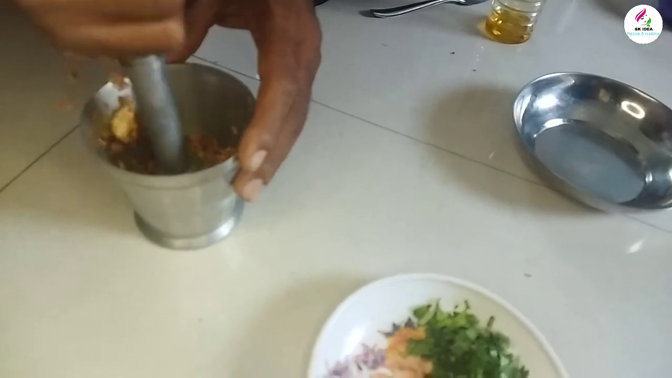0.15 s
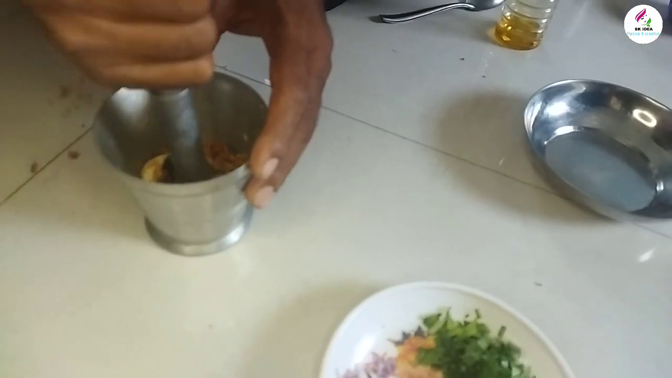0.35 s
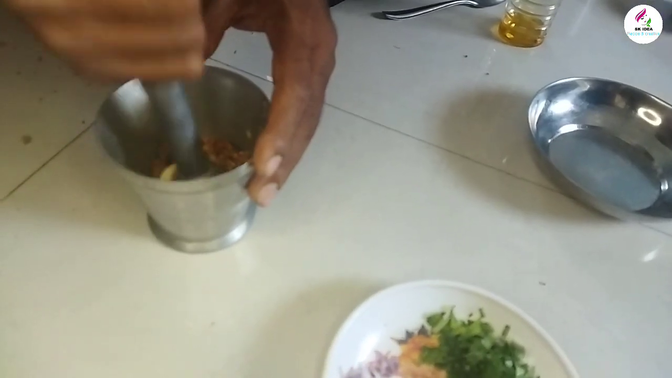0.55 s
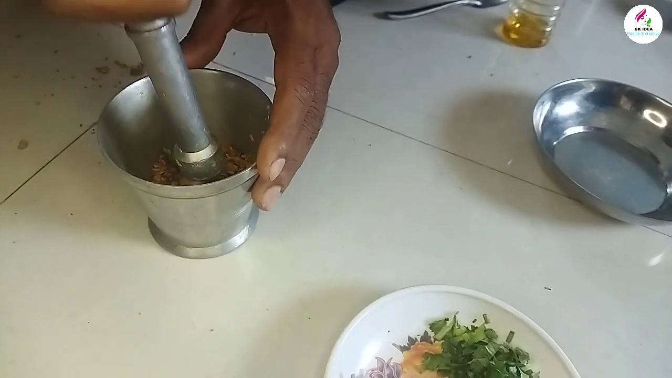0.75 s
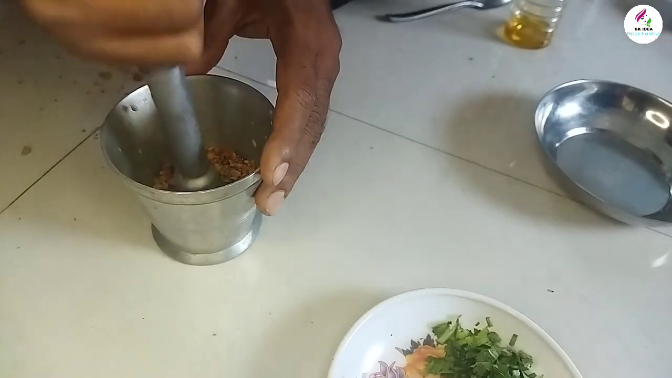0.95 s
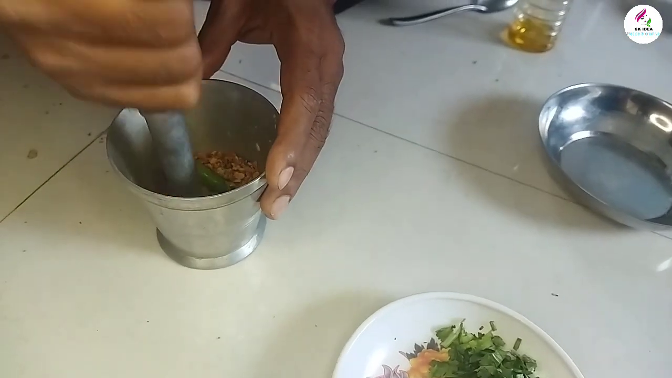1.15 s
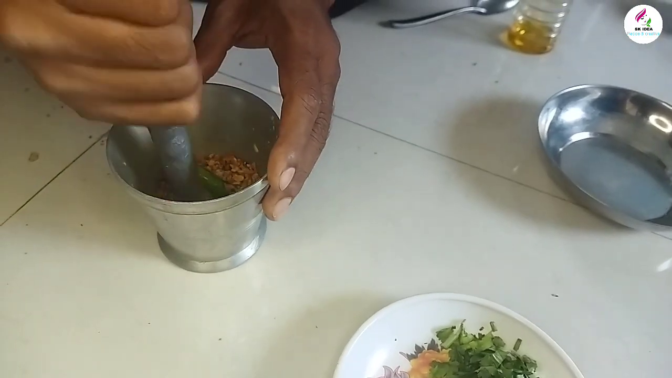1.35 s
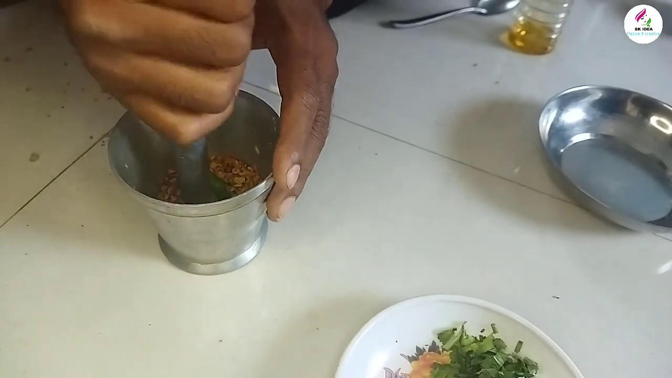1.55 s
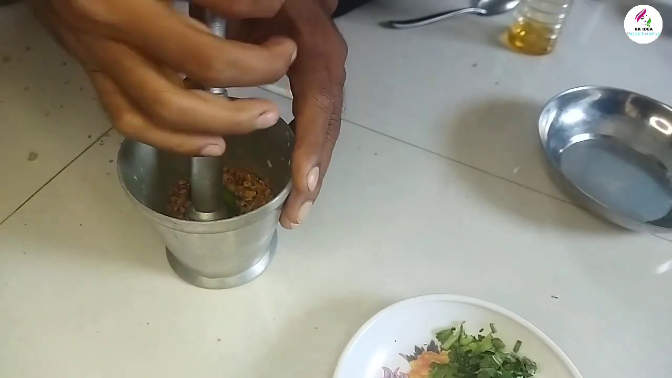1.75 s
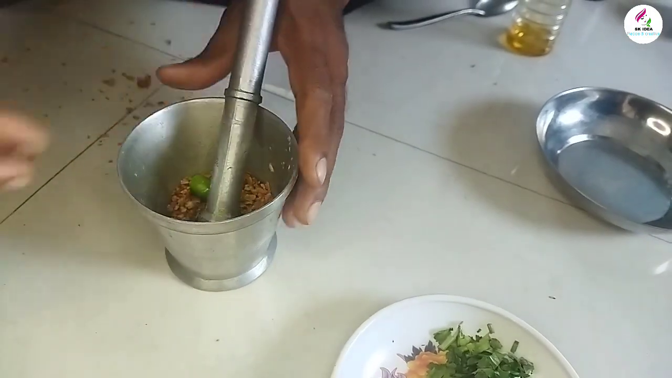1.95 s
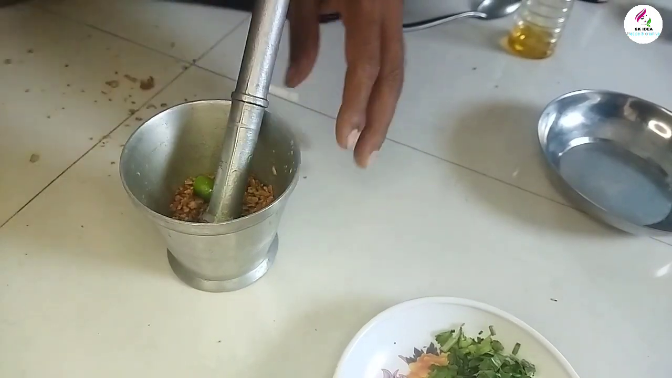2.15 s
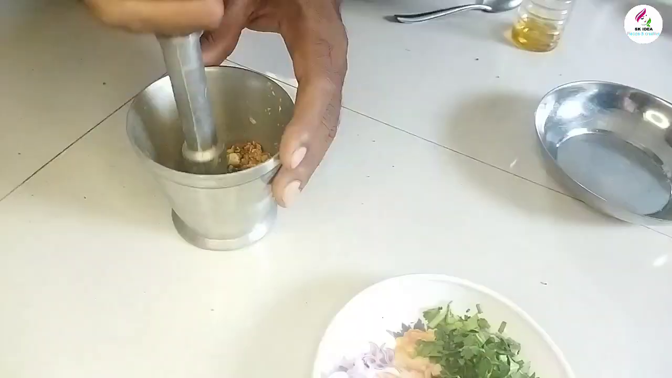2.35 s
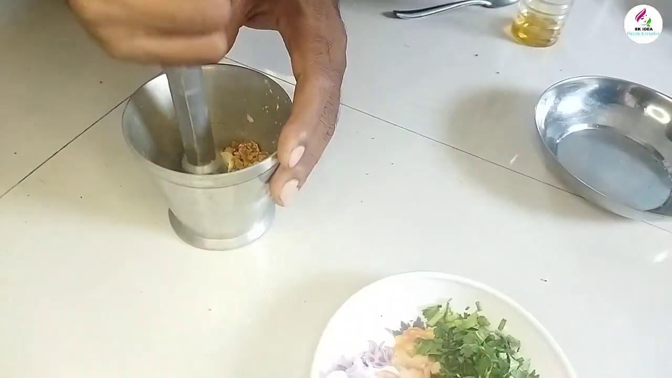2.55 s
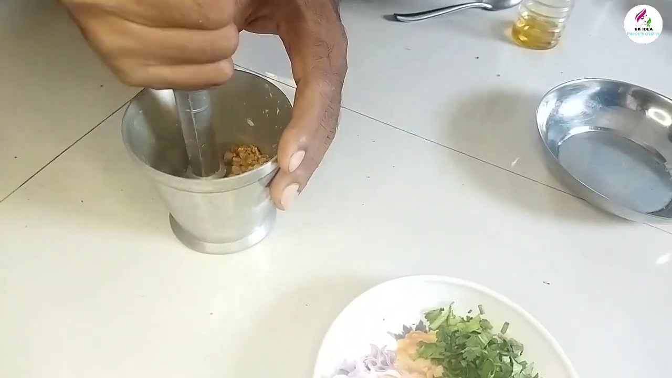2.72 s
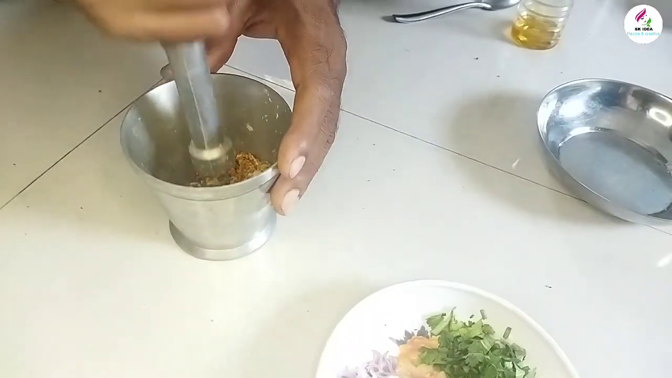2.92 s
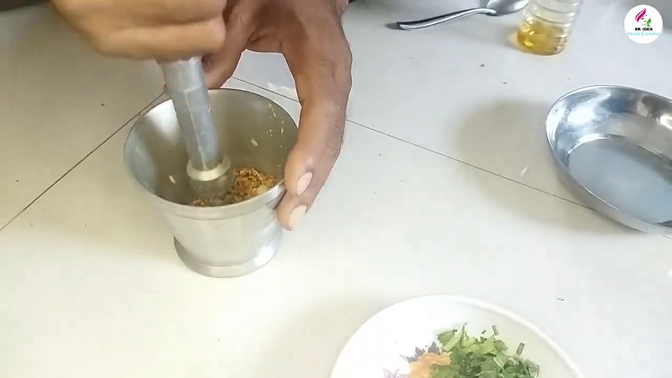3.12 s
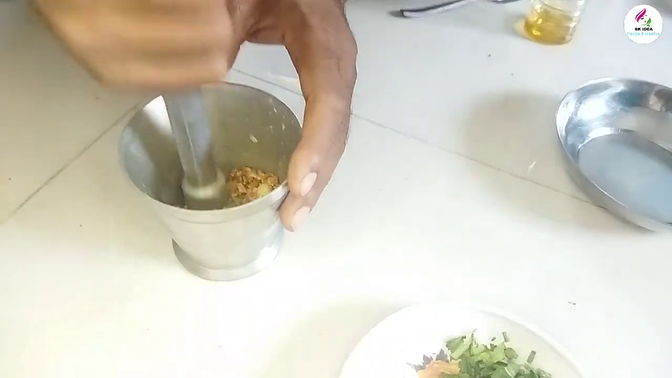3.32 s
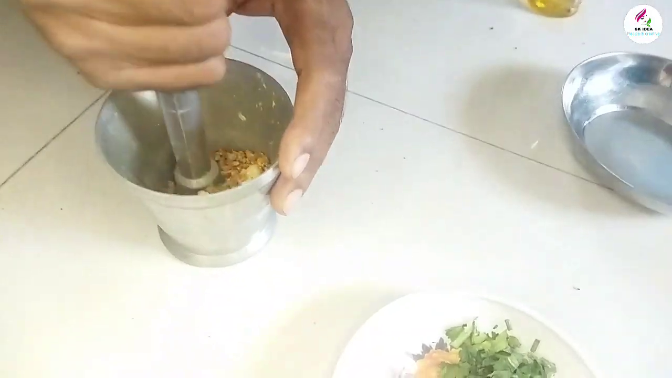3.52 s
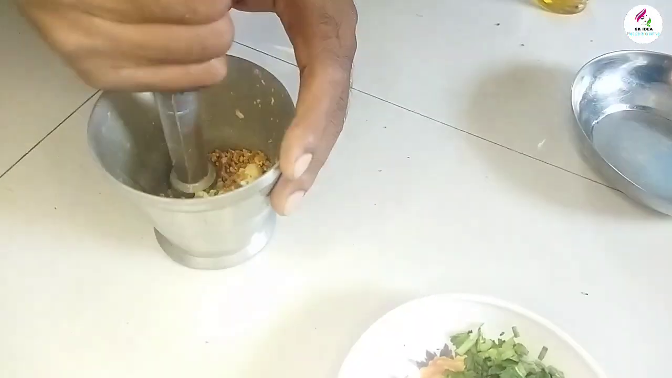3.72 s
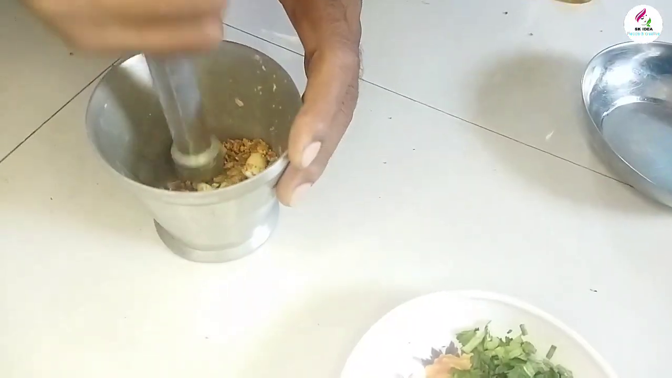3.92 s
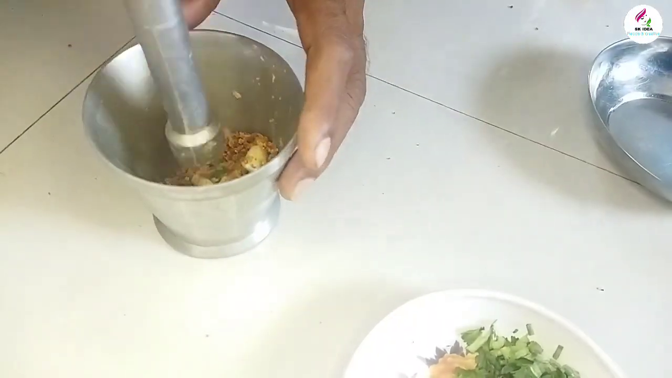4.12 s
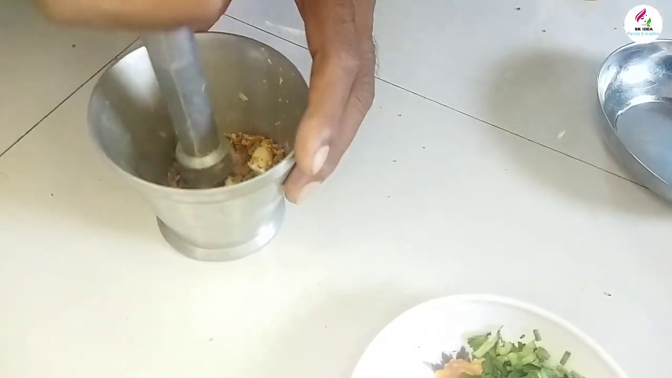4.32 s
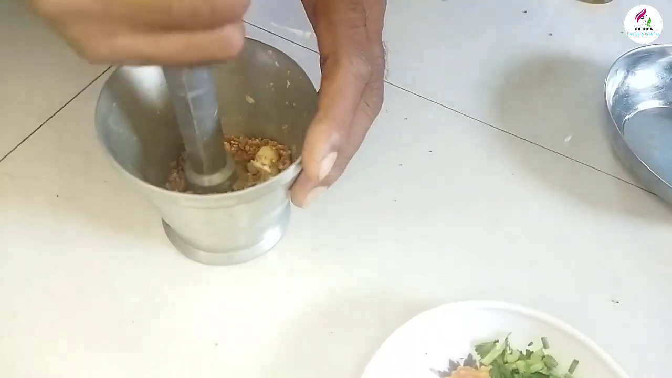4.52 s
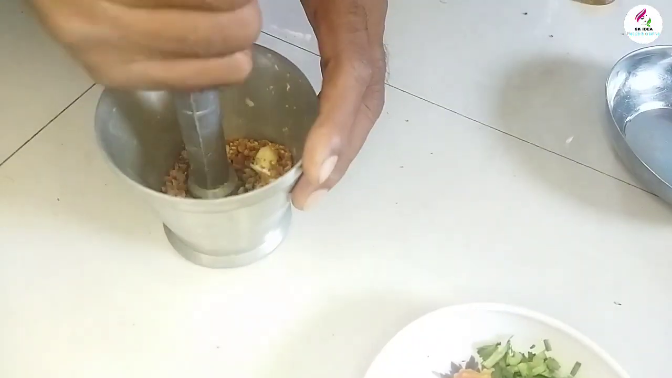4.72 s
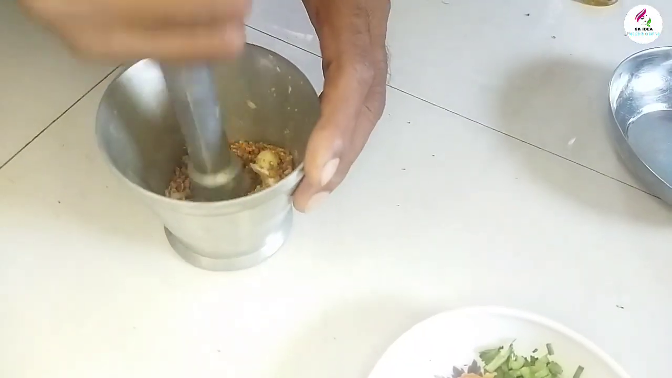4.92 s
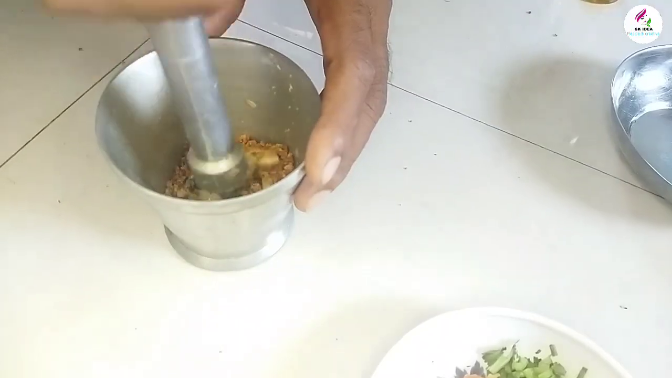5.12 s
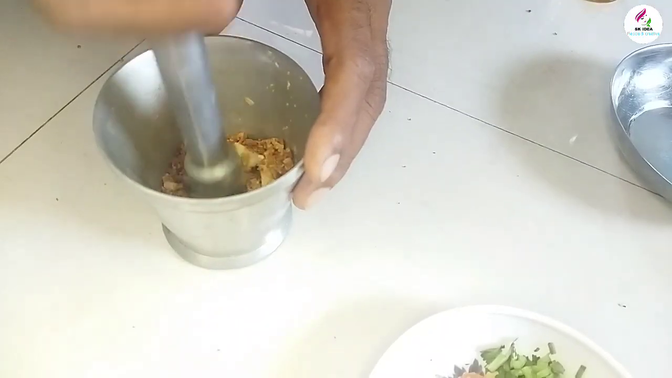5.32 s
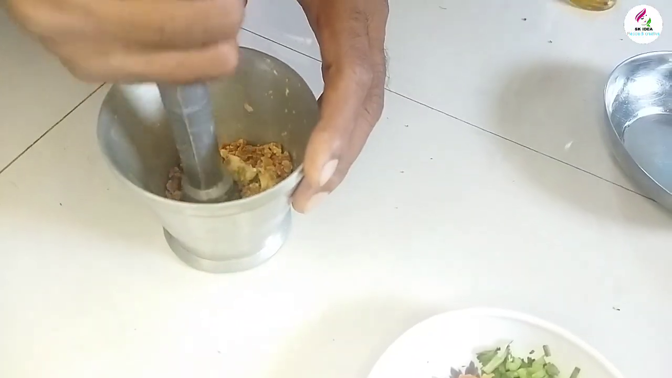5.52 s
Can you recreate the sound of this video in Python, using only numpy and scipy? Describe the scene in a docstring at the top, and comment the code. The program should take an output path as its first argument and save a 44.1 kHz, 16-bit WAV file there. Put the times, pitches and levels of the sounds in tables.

```python
"""Over a quiet motor hum, a steel pestle pounds spices in a steel mortar on tile, about four blows a second.
Most blows crunch into the food as swelling clumps of grainy noise; four reach bare metal, crack and ring in wall modes.
The mortar rocks with hollow, swelling tones, and dry seeds snap as short noise bursts.
In a short pause the hand hisses along the pestle, leans it on the rim and lets it rattle.
The motor, a set of wavering shaft multiples, stops in that pause; the hard kitchen answers with a noise-tail echo."""
import sys
import numpy as np
from scipy import signal
from scipy.fft import rfft, irfft, next_fast_len
from scipy.io import wavfile
from scipy.ndimage import map_coordinates

SR = 44100
rng = np.random.default_rng(int(sys.argv[2]) if len(sys.argv) > 2 else 0)


def output_pcm(signal):
    """Save a mono or channel-first signal as 16-bit PCM at the path in sys.argv[1].

    Samples are clipped to [-1, 1] before scaling.
    """
    pcm = np.clip(np.atleast_2d(signal).T, -1, 1) * 32767
    wavfile.write(sys.argv[1], SR, np.round(pcm).astype(np.int16))


N = 245637
TIME = np.arange(N) / SR


def amp(db):
    """Decibels to gain."""
    return 10 ** (np.asarray(db) / 20)


def unit(x):
    """Scale to rms 1."""
    return x / np.sqrt(np.mean(x ** 2) + 1e-20)


def along(points, hz):
    """Read a curve of (frequency, value) points on a log frequency axis."""
    point_hz, value = np.transpose(points)
    return np.interp(np.log(hz + 1), np.log(point_hz + 1), value)


def curves(rows):
    """One value per sample for each column after the time."""
    time_s, *columns = np.transpose(rows)
    return [np.interp(TIME, time_s, column) for column in columns]


def wobble(rate, size=N):
    """A smooth random curve with the given number of knots a second."""
    knots = rng.standard_normal(int(size * rate / SR) + 4)
    return map_coordinates(knots, [np.arange(size) * rate / SR])


def swell(start, peak, rise_db_per_s, fall_db_per_s):
    """Gain that sets in at start, climbs to 1 at peak and dies away."""
    db = np.minimum(rise_db_per_s * (TIME - peak), fall_db_per_s * (peak - TIME))
    onset = np.clip((TIME - start) / .005, 0, 1)
    return onset * amp(db)


def add(track, s, x):
    """Mix x into the track from time s on."""
    i = max(round(s * SR), 0)
    track[..., i:i + x.shape[-1]] += x[..., :N - i]


def pan(db):
    """Left and right gains for a level difference."""
    return amp([[db / 2], [-db / 2]])


# how alike noise is in the two channels: frequency_hz, correlation (-1 to 1)
STEREO_LIKENESS = [(100, 0.53), (600, 0.65), (1500, 0.25), (4000, 0.6), (8000, -0.33), (14000, 0.036)]


def noise(spectrum, size, tilt_db=0, spiky=0, uneven_db=0):
    """Coloured stereo noise of rms 1; spiky roughens it into clicks, uneven adds random spectral peaks and dips."""
    hz = np.fft.rfftfreq(size, 1 / SR)
    spikes = np.exp(spiky * rng.standard_normal(size).clip(-2, 2))
    white = rng.standard_normal((2, size)) * spikes
    ripple = map_coordinates(rng.standard_normal(size=100), [hz / 260])
    octaves = np.log2(np.maximum(hz, 1000) / 1000)
    # the tilt counts per two octaves above 1 kHz
    gain = amp(along(spectrum, hz) + tilt_db * octaves / 2 + uneven_db * ripple)
    # the mid-side mix sets the likeness of left and right
    turn = np.arccos(np.clip(along(STEREO_LIKENESS, hz), -1, 1)) / 2
    mid, side = irfft(rfft(white) * gain * [np.cos(turn), np.sin(turn)], size)
    return unit(np.array([mid + side, mid - side]))


# how long the kitchen rings: frequency_hz, t60_s
KITCHEN_DECAY = [(150, 0.43), (1000, 0.42), (2800, 0.38), (6000, 0.35), (10000, 0.34), (15000, 0.24)]


def echo(x, build=0.0019, gap=0.0041, wall_db=-15, wall_s=.0375):
    """The kitchen's answer: a tail that builds up, favours some frequencies, and holds one far wall."""
    hz, t, grains = signal.stft(rng.standard_normal((2, SR * 2 // 5)), SR, nperseg=256)
    uneven_db = rng.normal(0, 1.7, (len(hz), 1)) * (hz[:, None] > 1500)
    decay_db = -60 * t / along(KITCHEN_DECAY, hz)[:, None]
    tail = signal.istft(grains * amp(uneven_db + decay_db), SR, nperseg=256)[1]
    since_gap = np.maximum(np.arange(tail.shape[1]) / SR - gap, 0)
    tail = tail * (1 - np.exp(-since_gap / build))
    tail = tail / np.linalg.norm(tail[0])
    tail[:, round(wall_s * SR)] += amp(wall_db)
    return signal.fftconvolve(x, tail, axes=1)


def room(x, wet_db):
    """A sound with its echo."""
    wet = amp(wet_db) * echo(x)
    return wet + np.pad(x, [(0, 0), (0, wet.shape[1] - x.shape[1])])


# colour of the room's air: frequency_hz, relative_density_db (per Hz)
AIR_SPECTRUM = [(15, -57), (25, -19), (173, 3), (537, -7.5), (970, -6), (1110, -2.5), (1530, -5.5),
                (1800, -7.5), (3260, -11.5), (6550, -22), (7500, -27), (9810, -18.5), (10600, -30),
                (15500, -22.5)]
# level of the room's air, before a slight waver: time_s, level_db
AIR_LEVEL = [(0, -57.5), (2.1, -57.5), (2.45, -62.5), (5.57, -64.5)]


def room_air():
    """Still air as gently wavering coloured noise, with a faint unsteady tone at 181 Hz."""
    drone = amp(-72.0 + 1 * wobble(3.7)) * np.sin(2 * np.pi * 181 * TIME + 0.64 * wobble(3.7))
    air_db, = curves(AIR_LEVEL)
    return drone + amp(air_db + wobble(7.1)) * noise(AIR_SPECTRUM, N)


# the motor's orders: shaft_multiple, relative_level_db
MOTOR_PARTIALS = [(2, -19), (3, -20), (4, -43), (5, -9.5), (6, -3.5), (7, -15.5), (8, -19), (9, -30)]
# the motor slows a little as its load grows
SHAFT_HZ, SHAFT_SAG_HZ_PER_S, SHAFT_WAVER_HZ = 38.15, .25, 0.12
# it grows louder until it is switched off
MOTOR_OFF_S, MOTOR_DB, MOTOR_RISE_DB_PER_S, MOTOR_FALL_DB_PER_S = 2.115, -49, 2, 128


def motor():
    """Multiples of one sagging shaft speed, each wavering in level on its own."""
    shaft_hz = SHAFT_HZ - SHAFT_SAG_HZ_PER_S * TIME + SHAFT_WAVER_HZ * wobble(4.85)
    angle = 2 * np.pi * np.cumsum(shaft_hz) / SR
    hum = np.zeros(N)
    for multiple, db in MOTOR_PARTIALS:
        phase = rng.uniform(0, 2 * np.pi)
        hum += amp(db + 2.5 * wobble(4)) * np.sin(round(multiple) * angle + phase)
    return amp(MOTOR_DB) * swell(0, MOTOR_OFF_S, MOTOR_RISE_DB_PER_S, MOTOR_FALL_DB_PER_S) * hum


# colour of skin on steel: frequency_hz, relative_density_db (per Hz)
SKIN_SPECTRUM = [(240, -43), (400, -10), (796, -7), (1020, -9), (1170, 2), (1540, -14), (1660, -1),
                 (3110, -2.5), (6380, -12), (6990, -14), (9950, 3), (15500, -8)]
# the hand slides along the pestle: first_touch_s, greatest_speed_s, gain_db
HAND_SLIDES = [(1.679, 1.893, -39), (2.115, 2.27, -56.5)]
SLIDE_RISE_DB_PER_S, SLIDE_FALL_DB_PER_S = 62, 131
# the pestle grazes the wall: first_touch_s, greatest_pressure_s, gain_db
WALL_GRAZES = [(0.147, 0.245, -58.5), (0.383, 0.454, -51)]
GRAZE_RISE_DB_PER_S, GRAZE_FALL_DB_PER_S = 150, 330


def sliding():
    """Skin hisses over steel in quick little jerks; steel grazing steel makes high wall modes sing faintly."""
    speed, pressure, song = np.zeros((3, N))
    for start, peak, db in HAND_SLIDES:
        speed += amp(db) * swell(start, peak, SLIDE_RISE_DB_PER_S, SLIDE_FALL_DB_PER_S)
    jerks_db = 2.2 * wobble(45) + 2.2 * wobble(300)
    hiss = noise(SKIN_SPECTRUM, N, tilt_db=2, spiky=.8, uneven_db=2)
    for start, peak, db in WALL_GRAZES:
        pressure += amp(db) * swell(start, peak, GRAZE_RISE_DB_PER_S, GRAZE_FALL_DB_PER_S)
    for hz, db in [(10030, -7), (10890, -2)]:
        song += amp(db + 5 * wobble(30)) * np.sin(2 * np.pi * hz * TIME + 1.5 * wobble(90))
    return room(speed * amp(jerks_db) * hiss + pressure * song, wet_db=-4)[:, :N]


# colour of a breaking seed: frequency_hz, relative_density_db (per Hz)
SEED_SPECTRUM = [(300, -59), (1500, -26), (2700, -0.5), (5000, -10), (7500, -3.5), (10000, 3), (13000, 2),
                 (15000, -22.5)]
# single seeds snap: time_s, gain_db, treble_tilt_db (per two octaves above 1 kHz)
SEED_SNAPS = [(.314, -36, -24), (.8618, -18.5, -10), (2.61, -18, 6), (2.9955, -34, -22), (4.5013, -25, -2),
              (5.2206, -19, -3)]


def snapping(size=1024, count=36):
    """Dry seeds burst within a few milliseconds; loose crumbs tick into the cup at random times."""
    out, crumbs = np.zeros((2, 2, N))
    t = np.arange(size) / SR
    for s, db, tilt_db in SEED_SNAPS:
        burst = np.exp(-t / 0.0021) * noise(SEED_SPECTRUM, size, tilt_db, spiky=.3)
        add(out, s, room(amp(db) * burst, wet_db=-11.5))
    for when, strength in rng.random((count, 2)):
        tick = np.exp(-t / .0012) * noise(SEED_SPECTRUM, size, tilt_db=-12, uneven_db=5)
        add(crumbs, when * N / SR, amp(-59 + 11 * strength) * tick)
    return out + room(crumbs, wet_db=-11.5)[:, :N]


# colour of food breaking up: frequency_hz, relative_density_db (per Hz)
CRUNCH_SPECTRUM = [(100, -26.5), (520, -22), (760, -4.5), (1100, -7), (1450, -1.5), (1850, 0.5),
                   (3200, 1.5), (4700, -2.5), (6000, -7.5), (7700, -11.5), (9600, -3.5), (11000, -9),
                   (15000, -7.5)]
# colour of the thud at the bottom: frequency_hz, relative_density_db (per Hz)
THUD_SPECTRUM = [(25, -55.5), (70, -9), (190, -6), (340, 6.5), (520, -11.5), (760, 1.5), (1200, -5.5),
                 (3000, -52)]


def hollow(hz, swell=0.0038, size=2048):
    """A light contact, then the air in the cup swells and dies within a few cycles."""
    t = np.arange(size) / SR
    shape = (t / swell) ** 2 * np.exp(2 * (1 - t / swell))
    tone = np.sin(2 * np.pi * hz * t + np.array([[0], [.7]]))
    light_crunch = amp(-12) * noise(CRUNCH_SPECTRUM, size, tilt_db=-12)
    contact = light_crunch + amp(-15) * noise(THUD_SPECTRUM, size)
    return shape * tone + np.exp(-t / 0.0031) * contact


# the hollow note, and its relative spread from contact to contact
CUP_HZ, CUP_SCATTER = 1116.3, .03


def cup_note(db):
    """The cup's hollow note in the room, a little different in pitch each time."""
    hz = CUP_HZ * np.exp(rng.normal(0, CUP_SCATTER))
    return room(amp(db) * hollow(hz), wet_db=-8)


# the mortar tips and knocks on the tile as the pestle lifts or comes down: time_s, gain_db
MORTAR_KNOCKS = [(0.178, -41.5), (0.2754, -33.5), (0.39, -40), (0.4391, -40.5), (0.6756, -33),
                 (0.7906, -33), (0.9472, -34.5), (1.1883, -37.5), (1.296, -39), (2.0249, -40),
                 (2.4453, -42.5), (2.6948, -47), (2.9433, -40), (3.068, -39.5), (3.1815, -46),
                 (4.0918, -35), (4.313, -46), (4.5521, -45.5), (4.8085, -43.5), (5.535, -41)]
# let go, it rattles: start, first knock's gain, spacing, loss per knock
RATTLE_S, RATTLE_DB, RATTLE_GAP_S, RATTLE_LOSS_DB = 1.859, -21, .0155, 3.3


def rocking(count=5):
    """Each tip of the mortar onto the tile sounds its hollow note: single knocks and one dying rattle."""
    out = np.zeros((2, N))
    rattle = [(RATTLE_S + k * RATTLE_GAP_S, RATTLE_DB - k * RATTLE_LOSS_DB) for k in range(count)]
    for s, db in [*MORTAR_KNOCKS, *rattle]:
        add(out, s - .001, cup_note(db))
    return out


# the mortar's wall ringing freely: frequency_hz, relative_level_db, t60_s
WALL_MODES = [(1135, -21, .3), (1452, -24, .28), (1795, -7, .35), (2574, -18, .3), (2695, -13, .33),
              (2767, -13, .31), (2890, -15, .28), (3358, -19, .2), (4137, 4.5, .24), (4615, -17, .22),
              (7275, -28, .33), (10030, -13, .25), (10890, -21, .28), (12010, -27, .18), (12673, -15, .24),
              (14950, -20, .22)]


def ring(soft_db=0, size=SR * 2 // 5):
    """The wall's decaying modes, new in strength and phase each time; softness costs dB per octave above 1.8 kHz."""
    t = np.arange(size) / SR
    out = np.zeros((2, size))
    for hz, db, t60 in WALL_MODES:
        # nearly the same phase in both channels
        phase = rng.uniform(0, 2 * np.pi) + rng.normal(0, .4, (2, 1))
        strength_db = db + rng.normal(0, 1.2) - soft_db * np.log2(max(hz / 1800, 1))
        out += amp(strength_db - 60 * t / t60) * np.sin(2 * np.pi * hz * t + phase)
    return out * (1 - np.exp(-t / 0.00075))


# the wall's broad resonances while the pestle presses on it:
# frequency_hz, width_hz, relative_level_db, extra_gain_into_room_db
PRESSED_MODES = [(1190, 490, -25.5, 4), (1828, 210, -9.5, 5.5), (2753, 140, -6, 8), (3363, 307, 6.5, -9),
                 (4090, 92, -5.5, -10), (4370, 220, -7.5, -3.5), (6100, 170, -26.5, -25),
                 (6830, 570, -27.5, 12), (9020, 940, -12, 1.5), (10060, 67, -27.5, 11),
                 (11400, 180, -15.5, -25), (12650, 130, -18, -6.5), (14930, 260, -13.5, -14)]


def crack(chatter=0.0029, chatter_db=-19, size=2048):
    """A hard contact and brief chatter through the damped wall: the near sound and the part thrown into the room."""
    t = np.arange(size) / SR
    force = amp(chatter_db) * np.exp(-t / chatter) * rng.standard_normal((2, size))
    force[:, 0] += 1  # the first contact
    near, thrown = np.zeros((2, 2, size))
    for hz, width, db, room_db in PRESSED_MODES:
        phase = rng.normal(0, 1.0, (2, 1))
        mode = amp(db) * np.exp(-np.pi * width * t) * np.sin(2 * np.pi * hz * t + phase)
        near += mode
        thrown += amp(room_db) * mode
    cracks = [signal.fftconvolve(force, body, axes=1) for body in (near, thrown)]
    # the cracks carry little bass
    bass_cut = signal.butter(2, 800, "highpass", fs=SR, output="sos")
    return signal.sosfilt(bass_cut, cracks)


# the pestle is leant on the rim: time_s, crack_gain_db (before a 3 dB cut), ring_gain_db
RIM_TAPS = [(1.86, -47, -40), (1.906, -40, -43), (2.283, -34.5, -43), (2.2888, -30, -41)]


def leaning():
    """Gentle steel taps: the thrown part of a crack in the room, and a soft ring."""
    out = np.zeros((2, N))
    for s, crack_db, ring_db in RIM_TAPS:
        _, thrown = crack()
        add(out, s, room(amp(crack_db - 3) * thrown, wet_db=-1))
        add(out, s, amp(ring_db) * ring(soft_db=14))
    return out


# steel meets steel: time_s, crack_gain_db, ring_gain_db, thump_gain_db
STEEL_CLANGS = [(3.2435, -10, -30, -41), (3.4923, -11.5, -28.5, -33.5), (3.7314, -9.5, -25.5, -32),
                (3.9755, -11, -19, -55)]
FOOT_HZ = 397  # the mortar bouncing on the tile


def clanging():
    """Bare steel cracks, the wall rings on and the floor thumps."""
    out = np.zeros((2, N))
    t = np.arange(SR // 10) / SR
    bounce = np.exp(-t / 0.007) * np.sin(2 * np.pi * FOOT_HZ * t)
    push = (1 - t / .003) * np.exp(-t / 0.0013) + amp(-3) * bounce
    for s, crack_db, ring_db, thump_db in STEEL_CLANGS:
        near, thrown = crack()
        add(out, s, amp(crack_db) * near)
        add(out, s, amp(crack_db - 4.5) * echo(thrown, build=0.041, wall_db=-6))
        add(out, s, room(amp(ring_db) * ring(), wet_db=-9))
        add(out, s, amp(thump_db) * room(np.array([push, push]), wet_db=-11.5))
    return out


def crush(db, rise, fall, tilt_db, thud_db, size=4096):
    """The crunch grows in clumps from first touch as food packs, then dies with a thud at the bottom, midway through."""
    t = (np.arange(size) - size // 2) / SR
    touch = np.clip((t + rise) / .005, 0, 1)
    squeeze_db = -17 * np.abs(t / rise) ** 1.07
    release_db = -14 * np.abs(t / fall) ** 1.17
    press = touch * amp(np.where(t < 0, squeeze_db, release_db))
    clumps = amp(1.8 * wobble(700, size))
    grains = noise(CRUNCH_SPECTRUM, size, tilt_db, spiky=.55, uneven_db=2.2)
    crunch = amp(db) * press * clumps * grains * pan(db=-1)
    thud = amp(thud_db) * np.exp(-np.abs(t - .002) / 0.0045) * noise(THUD_SPECTRUM, size)
    return room(crunch + thud, wet_db=-10.5)


# blows into the food: bottom_s, crunch_gain_db, squeeze_s (first touch to bottom),
# treble_tilt_db (per two octaves above 1 kHz), thud_gain_db, hollow_gain_db
FOOD_BLOWS = [(.078, -22.5, 0.023, .5, -45.5, -29), (.343, -24, 0.013, 2, -54, -33.5),
              (.612, -23, 0.013, -0.5, -37.5, -28.5), (0.8628, -24.5, 0.012, -2, -34.5, -29.5),
              (1.1209, -21, 0.0087, -1.5, -55, -27), (1.383, -24.5, 0.0086, 2, -33.5, -30.5),
              (2.495, -24.5, .018, 3, -41, -35), (2.753, -25, 0.023, 3.5, -47, -36),
              (3.008, -25, 0.017, -.5, -47.5, -28.5), (4.248, -23, .025, 1.5, -49, -44),
              (4.501, -25, 0.029, -4.5, -33, -29), (4.749, -24.5, 0.022, 2, -38, -40),
              (4.983, -24, 0.015, 2.5, -46, -38), (5.22, -26, 0.022, 2, -49, -35),
              (5.46, -22.5, .012, 7, -44.5, -30.5)]
FALL_S = 0.0067  # time for the crunch to drop 14 dB in packed food
# loose food after a pause crumbles longer: extra fall time, share still loose after each blow, pause needed
FRESH_FALL_S, FRESH_LEFT, PAUSE_S = 0.0088, 0.22, .6
# the thin film of food crushed under a clang
FILM_DB, FILM_SQUEEZE_S, FILM_TILT_DB, FILM_THUD_DB, FILM_HOLLOW_DB = -27.5, .014, -2.5, -37.5, -25


def pounding(size=4096):
    """Blows crush food and sound the cup; loose food packs within a few blows, a clang crushes only a film."""
    out = np.zeros((2, N))
    lead = size // 2 / SR  # a crush reaches bottom midway through
    last, loose = -np.inf, 1
    for s, db, rise, tilt_db, thud_db, hollow_db in FOOD_BLOWS:
        loose = 1 if s - last > PAUSE_S else loose * FRESH_LEFT
        last = s
        fall = FALL_S + FRESH_FALL_S * loose
        add(out, s - lead, crush(db, rise, fall, tilt_db, thud_db, size=size))
        # the food cushions the blow, so the wall barely rings
        add(out, s, amp(db - 26.5) * ring(soft_db=8.5, size=SR // 4))
        add(out, s - .002, cup_note(hollow_db))
    for s, *_ in STEEL_CLANGS:
        film = crush(FILM_DB, FILM_SQUEEZE_S, FALL_S, FILM_TILT_DB, FILM_THUD_DB, size=size)
        add(out, s + .0015 - lead, film)
        add(out, s, cup_note(FILM_HOLLOW_DB))
    return out


def scene():
    """Everything heard from just above the mortar."""
    background = room_air() + motor()
    handling = sliding() + snapping() + rocking() + leaning()
    return background + handling + clanging() + pounding()


# balance of the two microphone ports: frequency_hz, left_minus_right_db
PORT_BALANCE = [(100, 0.5), (3000, 1.5), (4500, 1.5), (8000, 1.5), (10000, 9), (11200, -8.5), (12500, 10.5),
                (15000, 2.5)]
TOP_HZ = 15400  # band limit


def record(dry):
    """The ports differ in treble balance; the recorder rounds the highest peaks and cuts steeply above its band limit."""
    size = next_fast_len(N + 8192)
    hz = np.fft.rfftfreq(size, 1 / SR)
    lean_db = along(PORT_BALANCE, hz) / 2
    heard = irfft(rfft(dry, size) * amp([lean_db, -lean_db]), size)
    rounded = heard / (1 + np.abs(heard / .9) ** 6) ** (1 / 6)
    band_limit = 1 / np.sqrt(1 + (hz / TOP_HZ) ** 160)
    return irfft(rfft(rounded) * band_limit, size)[:, :N]


dry = scene()
out = record(dry)
output_pcm(out)
```